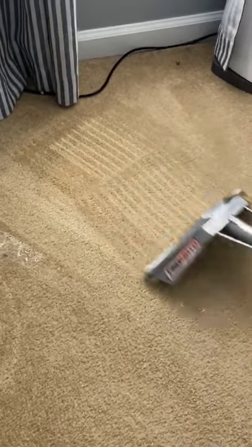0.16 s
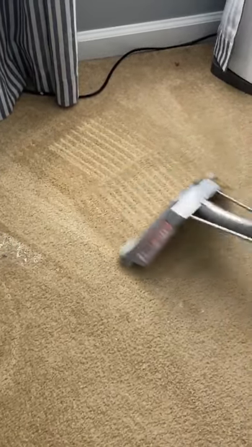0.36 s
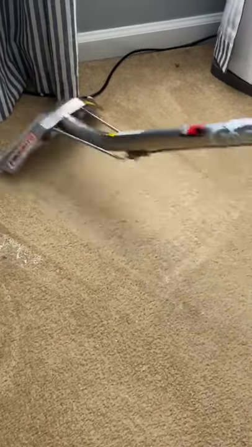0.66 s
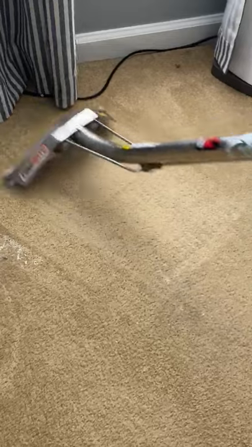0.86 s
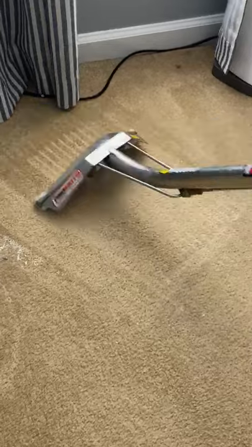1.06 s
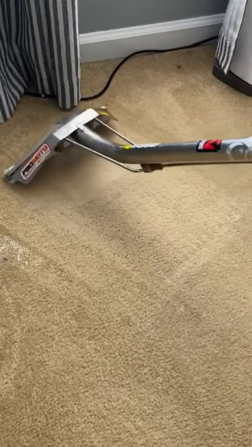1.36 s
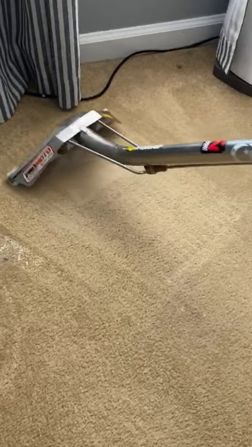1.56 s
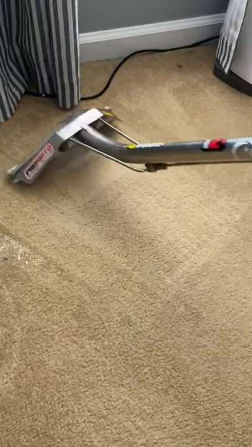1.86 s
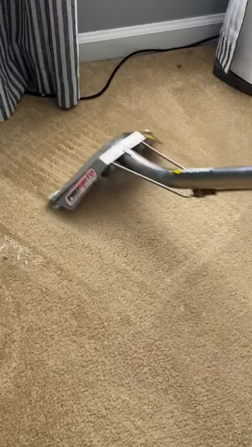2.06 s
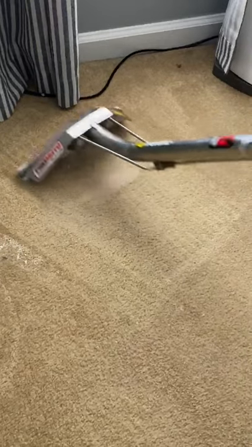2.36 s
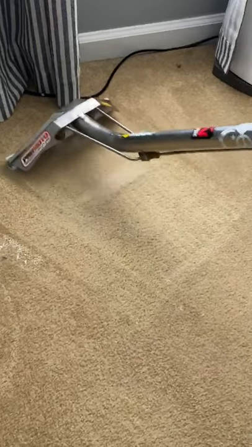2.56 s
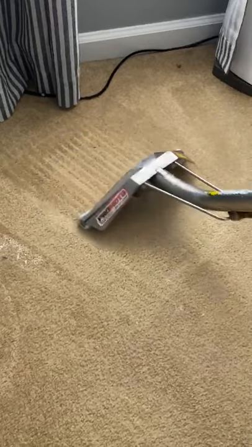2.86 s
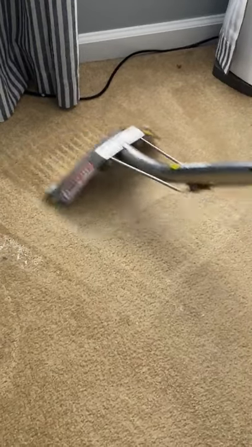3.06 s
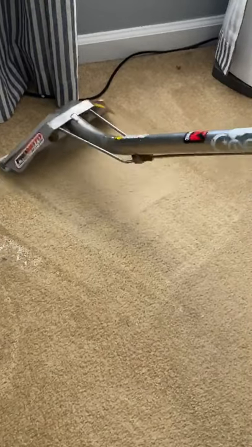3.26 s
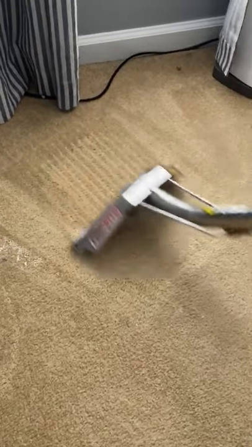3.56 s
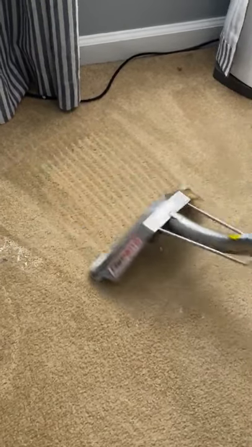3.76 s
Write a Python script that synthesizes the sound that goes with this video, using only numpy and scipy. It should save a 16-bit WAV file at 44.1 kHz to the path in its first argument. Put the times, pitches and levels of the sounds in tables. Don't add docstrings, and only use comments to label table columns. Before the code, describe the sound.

Continuous rushing suction from a carpet wand swells slightly with each stroke over the pile, while water jets hiss and low wooden thumps knock underneath; small carpeted room, recorded nearby on a stereo phone.

```python
import sys
import numpy as np
from scipy import signal
from scipy.fft import rfft, irfft, dct, next_fast_len
from scipy.io import wavfile
from scipy.ndimage import uniform_filter1d

SR = 44100
rng = np.random.default_rng(int(sys.argv[2]) if len(sys.argv) > 2 else 0)


def gain_from_db(level_db):
    decades = np.asarray(level_db, float) / 20
    return 10 ** decades


def inscribe(sig):
    pcm = np.round(np.clip(np.atleast_2d(sig).T, -1, 1) * 32767)
    wavfile.write(sys.argv[1], SR, pcm.astype(np.int16))


N = 172872

# t/s, suction level/dB, spray level/dB, head drag on pile/dB
STROKE = [(0.0, -30.5, -35.5, -1.5), (0.16, -31, -36.5, 3), (0.24, -37, -46, 4), (0.36, -32.5, -28, -7.5),
          (0.5, -34.5, -15, 0.5), (0.52, -33.5, -33, 5), (0.85, -31, -35.5, -2.3), (2.05, -30, -34, -4),
          (2.43, -30, -36.5, -2.6), (2.53, -33, -33, -3), (2.72, -29, -35, -3), (2.85, -31.5, -39.5, 2.5),
          (2.93, -30, -36, -6), (3.61, -30.5, -35.5, 4.5), (3.65, -34, -41, -2), (3.68, -31.5, -38, -7.5),
          (3.84, -29.5, -37, 2.5), (3.92, -32, -38, -1.7)]
# f/Hz, level/dB
SLOT_SPECTRUM = [(30, 4.5), (60, 3.5), (250, -0.5), (550, -5), (1400, -4), (2300, 1), (5200, 1), (8000, -6)]
# f/Hz, level/dB
JET_SPECTRUM = [(1500, -11.5), (4000, -8.5), (7300, -4), (10200, 4.5), (11800, 2), (14100, 4),
                (15700, -2.54)]
# t/s, knock level/dB, ring level/dB,
# knock f/Hz
THUMPS = [(.097, -21, -48, 247), (0.112, -26.5, -24.5, 296), (.124, -24, -48, 400), (0.139, -31, -25, 296),
          (.174, -25, -53, 880), (.18, -24, -46, 1300), (.192, -28, -35, 315), (.208, -28.5, -40, 610),
          (.362, -27, -50, 225), (.382, -29.5, -42, 235), (.412, -34, -35.5, 178), (.452, -34, -47, 198),
          (.518, -26, -54, 840), (.522, -23.5, -49, 337), (.536, -28.5, -54, 105), (.551, -31.5, -59, 330),
          (0.59, -32, -56.5, 106), (1.035, -35, -34, 200), (1.341, -42, -52, 130), (1.545, -33, -31, 222),
          (1.966, -40, -35.5, 200), (2.036, -28.5, -44, 262), (2.07, -40, -44, 150), (2.779, -37, -36, 200),
          (2.858, -29, -60, 258), (3.22, -23.5, -45, 940), (3.47, -30, -54, 285), (3.515, -32.5, -34, 304),
          (3.529, -27, -60, 1060), (3.546, -38, -37.5, 170), (3.571, -36, -37, 202), (3.621, -31, -44, 190),
          (3.632, -23, -55.5, 1010), (3.647, -25, -59, 800), (3.692, -37.5, -29.5, 181),
          (3.815, -44, -35, 201), (3.89, -29, -44, 344)]
# f/Hz, level/dB, t60/s
BOARDS = [(161.5, 0, .27), (108, -13, .25), (205, -11, .2), (291, -14, .25), (382, -15, .25),
          (630, -18, .35)]
# f/Hz, width/Hz, level/dB
HOSE_MODES = [(79.5, 3.5, -52.5), (205.2, 5.8, -47), (243.1, 23, -53.5), (855, 41, -49.5), (974.5, 48, -53),
              (761, 26, -53.5), (1149.5, 50, -55.5)]
# f/Hz, left lead/rad
PORT_LEAD = [(1950, 0), (2580, 1.2), (3530, 0), (4100, .4), (4715, 1.55), (5215, 6.28), (5900, 6.35),
             (11800, 9.42)]
# f/Hz, correlation/1
PORT_LIKENESS = [(125, 1), (700, 0.86), (1650, 1), (2900, .85), (3600, 0.85), (5500, 0.98), (7500, 0.56),
                 (12500, 0.87)]
# f/Hz, left minus right/dB
PORT_SKEW = [(125, 0), (210, -1.2), (400, -0.5), (750, 2), (1150, 4.5), (1500, 0)]
# f/Hz, depth/dB
STEREO_DEPTH = [(200, 24.5), (1250, 22), (1450, 10), (4000, 10), (6000, 14), (10900, 9.5), (12000, 5),
                (13300, 4)]
# t/s, lowest f/Hz, extra depth/dB
DEEPER = [
    (1.005, 12300, 16),
    (2.282, 14300, 16),
]


def evened(x):
    return x / np.sqrt(np.mean(abs(x) ** 2) + 1e-20)


def read(points, f_hz):
    f, value = np.transpose(points)
    return np.interp(np.log(f_hz + 1), np.log(f + 1), value)


def stroke(t_s, column):
    rows = np.transpose(STROKE)
    mean_db = rows[column].mean()
    return np.interp(t_s, rows[0], rows[column]) - mean_db, mean_db


def hiss(spectrum, level_db, patchy_db, flicker_db, flicker_hz):
    frames, f_hz = N // 256 + 5, np.fft.rfftfreq(1024, 1 / SR)
    a, b, c, d, patches, flicker = rng.standard_normal((frames, 513, 6)).T
    patches = uniform_filter1d(patches, size=12, axis=0)
    patches = evened(uniform_filter1d(patches, size=12, axis=1))
    flicker = uniform_filter1d(flicker, size=max(1, int(flicker_hz / 43)), axis=0)
    flicker = evened(uniform_filter1d(flicker, size=3, axis=1))

    cross_hz, cross_width_hz = 4885, 220
    apart = 1 - np.clip(read(PORT_LIKENESS, f_hz), 0, 1)
    apart = apart * (1 - np.exp(-((f_hz - cross_hz) / cross_width_hz) ** 2))
    same = 1 - apart[:, None]
    left = a + 1j * b
    right = same * left + np.sqrt(1 - same ** 2) * (c + 1j * d)

    z = np.array([left, right])
    z *= gain_from_db(read(spectrum, f_hz)[:, None] + patchy_db * patches + flicker_db * flicker)
    z = z * gain_from_db(level_db(np.arange(frames) * 256 / SR, f_hz[:, None]))
    return signal.istft(z, nperseg=1024, noverlap=768)[1][:, :N]


def resonate(x, f_hz, width_hz):
    turn = np.exp(2j * np.pi * f_hz * np.arange(len(x)) / SR)
    r = np.exp(-np.pi * width_hz / SR)
    return 2 * (turn * signal.lfilter([1 - r], [1, -r], x / turn)).real


def suction():
    low_hz, low_follow = 1320, 0.26
    drag_hz = 170

    def level_db(t_s, f_hz):
        high = 1 / (1 + (low_hz / (f_hz + 1)) ** 2)
        roar_db = stroke(t_s, column=1)[0]
        drag_db = stroke(t_s, column=3)[0] / (1 + (drag_hz / (f_hz + 1)) ** 4)
        return roar_db * high + (1 - high) * (low_follow * roar_db + drag_db)

    air = hiss(SLOT_SPECTRUM, level_db, patchy_db=1.5, flicker_db=0.54, flicker_hz=2350)
    mean_db = stroke(0, column=1)[1]
    return gain_from_db(mean_db + 4.5) * evened(air)


def spray():
    shut_s, open_s, settle_s = 0.13, 0.518, 0.045
    shut_db, shut_fall_s = -5.5, 0.06
    spurt_db, spurt_s = 3.5, 0.0088
    t = np.arange(N) / SR
    water = hiss(JET_SPECTRUM, lambda t_s, f_hz: 0 * t_s + 0 * f_hz,
                 patchy_db=2.0, flicker_db=1.18, flicker_hz=3820)

    fall_db = shut_db * np.clip((t - shut_s) / shut_fall_s, 0, 1)
    burst_db = spurt_db * np.exp(-abs(t - open_s) / spurt_s)
    valve_db = np.where(t < open_s, fall_db, burst_db)

    stroke_s = np.where(t < open_s, t, np.maximum(t, open_s + settle_s))
    move_db, mean_db = stroke(stroke_s, column=2)
    move_db = np.where((t > shut_s) & (t < open_s), -1.1, move_db)
    return gain_from_db(mean_db + 8.5 + uniform_filter1d(move_db, size=40) + valve_db) * evened(water)


def thumps():
    knock_q, knock_s, grit = 2.4, 0.016, 0.35
    ring_gain_db, ring_rise_s = 4, 0.006
    out, t = np.zeros(N), np.arange(0, 0.6, 1 / SR)
    for s, knock_db, ring_db, knock_hz in THUMPS:
        ring = np.zeros(len(t))
        for k, (f_hz, db, t60_s) in enumerate(BOARDS):
            phase, extra_db = (rng.random(2) * [1, 6.6]) if k > 0 else (0, 0)
            decay = gain_from_db(db + extra_db - 60 * t / t60_s)
            ring += decay * np.sin(2 * np.pi * (f_hz * (s + t) + phase))
        ring *= 1 - np.exp(-t / ring_rise_s)

        push = (12 * (t == 0) + grit * rng.standard_normal(len(t))) * np.exp(-t / knock_s)
        width_hz = knock_hz / knock_q
        knock = resonate(resonate(push, knock_hz, width_hz), knock_hz, width_hz)
        thump = gain_from_db(ring_db + ring_gain_db) * ring + gain_from_db(knock_db) * knock / abs(knock).max()
        part = out[round(s * SR):][:len(thump)]
        part += thump[:len(part)]
    return out


def hose():
    wander_hz, fuzz_share = 2.5, 0.6
    out = np.zeros(N)
    for f_hz, width_hz, db in HOSE_MODES:
        noise, drift = rng.standard_normal((2, N))
        pitch_hz = f_hz + wander_hz * evened(uniform_filter1d(drift, size=3000))
        tone = np.sin(2 * np.pi * np.cumsum(pitch_hz) / SR)
        fuzz = resonate(resonate(noise, f_hz, width_hz), f_hz, width_hz)
        hum = fuzz_share * evened(fuzz) + (1 - fuzz_share) * evened(tone) * 10 / width_hz
        out += gain_from_db(db) * evened(hum)
    return out


def ports(pair):
    size = next_fast_len(N + 2048)
    f_hz = np.fft.rfftfreq(size, 1 / SR)
    level = gain_from_db(np.multiply.outer([0.5, -0.5], read(PORT_SKEW, f_hz)))
    phase = np.exp(np.multiply.outer([0, -1j], read(PORT_LEAD, f_hz)))
    return irfft(rfft(pair, size) * level * phase, size)[:, :N]


def scene():
    return ports(suction() + spray() + (thumps() + hose()) * np.ones((2, 1)))


def thin_stereo(x):
    grid = 280
    spare_db, spare_s = 3, 0.82
    top_spare_db, top_hz, top_end_hz = 4, 11500, 13400
    wobble_db, step_db, hole_db = 1.5, -0.34, -0.5

    n = np.arange(2048)
    window = np.sin(np.pi * (n + 0.5) / 2048)
    pair = np.array([x[0] + x[1], x[0] - x[1]]) / 2
    pair = np.pad(pair, ((0, 0), (2048 - grid, 3072)))
    starts = np.arange(0, pair.shape[1] - 2048, 1024)
    a, b, c, d = np.split(pair[:, starts[:, None] + n] * window, 4, axis=2)
    z = dct(np.concatenate([-c[..., ::-1] - d, a - b[..., ::-1]], axis=2), type=4, norm="ortho")

    widths = np.repeat([4, 8, 12, 16, 20, 24, 28, 32], [10, 7, 4, 2, 2, 2, 2, 22])
    edges = np.cumsum(widths) - widths
    power_db = 10 * np.log10(np.add.reduceat(z ** 2, edges, axis=2) / widths + 1e-20)
    loudest_db = power_db.max(0)

    f_hz = (edges + widths / 2) * SR / 2048
    middle_s = (starts + grid - 1024) / SR
    early = 1 / (1 + (starts / SR / spare_s) ** 6)
    extra_db = np.outer(early, spare_db + top_spare_db * (f_hz > top_hz) * (f_hz < top_end_hz))
    extra_db = extra_db + wobble_db * rng.standard_normal((len(starts), 1))
    for s, from_hz, db in DEEPER:
        extra_db = extra_db + db * np.outer(abs(middle_s - s) < 512 / SR, f_hz > from_hz)
    limit_db = loudest_db - np.maximum(read(STEREO_DEPTH, f_hz) + extra_db, 2)

    near_db = 10 * np.log10(abs(uniform_filter1d(z ** 2, size=7, axis=2)) + 1e-20)
    depth_db = np.repeat(loudest_db - limit_db, widths, axis=1)
    z = z * (near_db > near_db.max(0) - depth_db - hole_db)
    step = np.repeat(gain_from_db(limit_db + step_db), widths, axis=1)
    z = np.round(z / step) * step * np.repeat(power_db > limit_db, widths, axis=2)

    u, v = np.split(dct(z, type=4, norm="ortho"), 2, axis=2)
    frames = np.concatenate([v, -v[..., ::-1], -u[..., ::-1], -u], axis=2) * window
    out = np.zeros(pair.shape)
    for half in (0, 1024):
        out[:, half:half + 1024 * len(starts)] += frames[:, :, half:half + 1024].reshape(2, -1)
    mid, side = out[:, 2048 - grid:][:, :N]
    return np.array([mid + side, mid - side])


def roll_off(x):
    return signal.sosfilt(signal.butter(12, 17060, fs=SR, output="sos"), x)


def record(dry):
    low_cut = signal.butter(4, 44, "high", fs=SR, output="sos")
    band_limit = signal.firwin(2047, 15780, window=("kaiser", 9), fs=SR)
    x = signal.sosfilt(low_cut, dry)
    x = signal.oaconvolve(x, band_limit[None], "same")
    mix = thin_stereo(x)
    return roll_off(mix)


dry = scene()
out = record(dry)
inscribe(out)
```